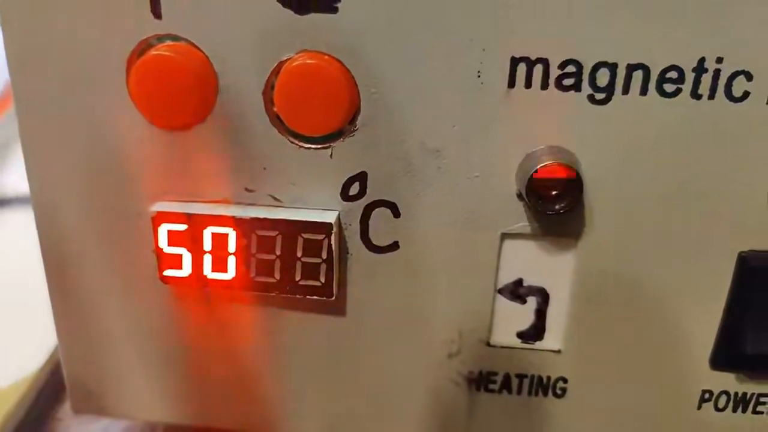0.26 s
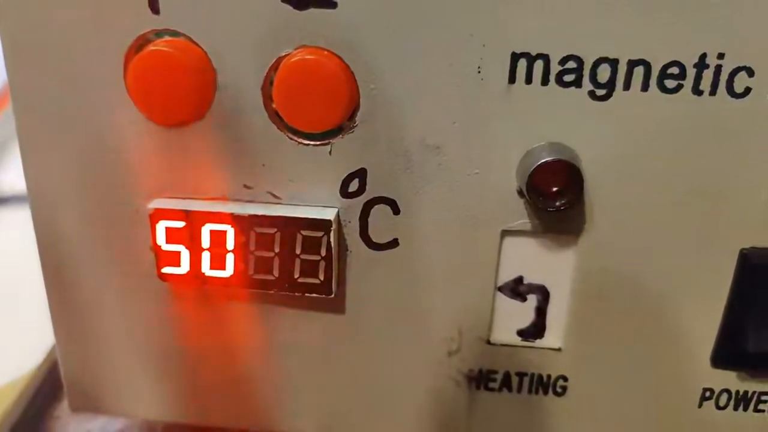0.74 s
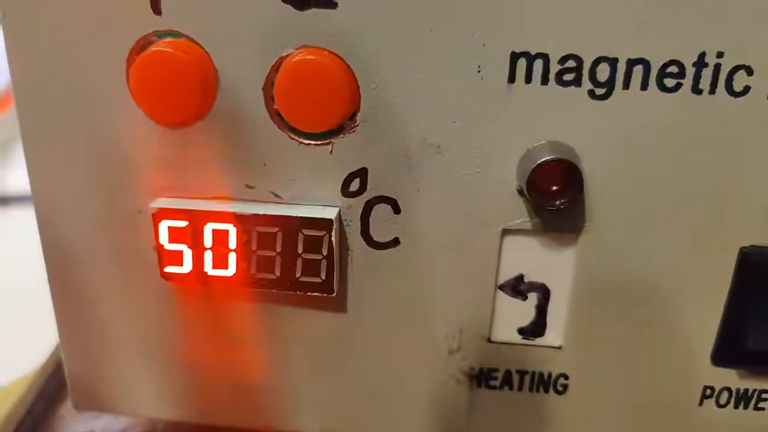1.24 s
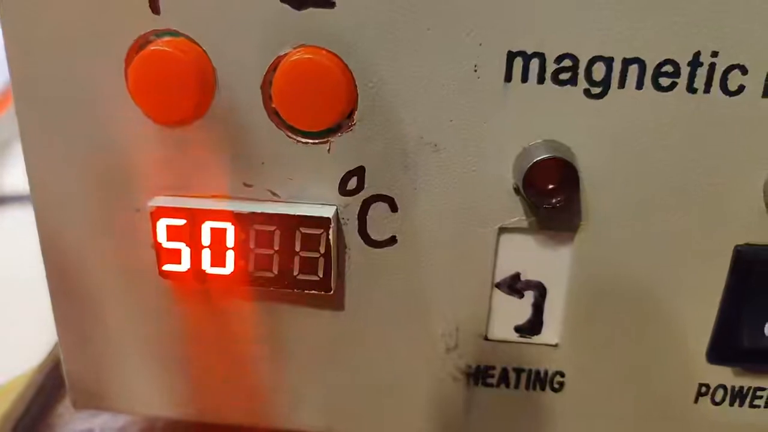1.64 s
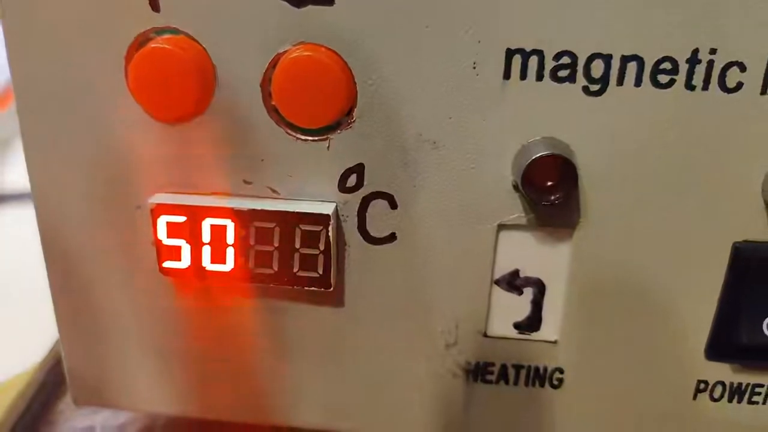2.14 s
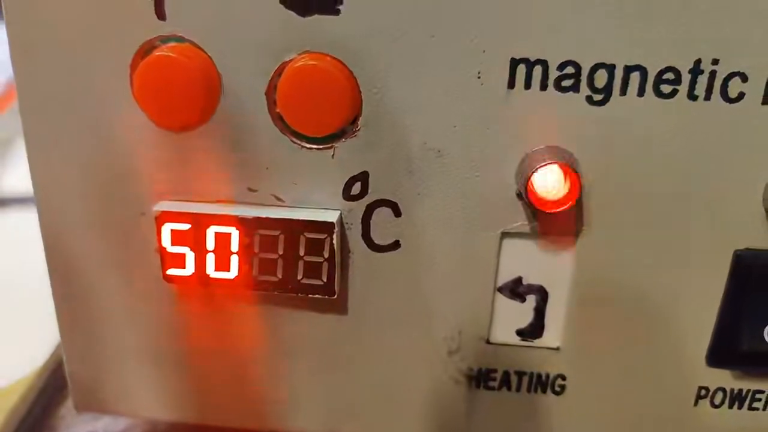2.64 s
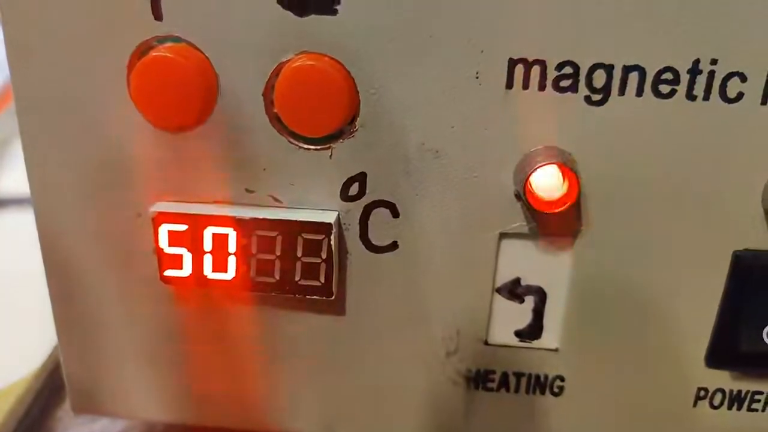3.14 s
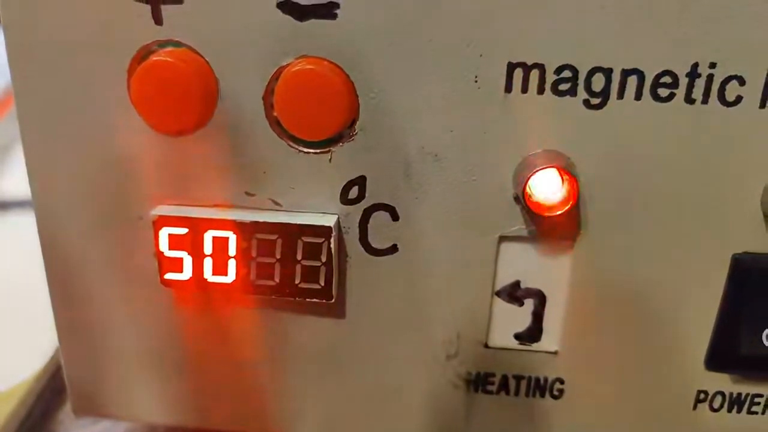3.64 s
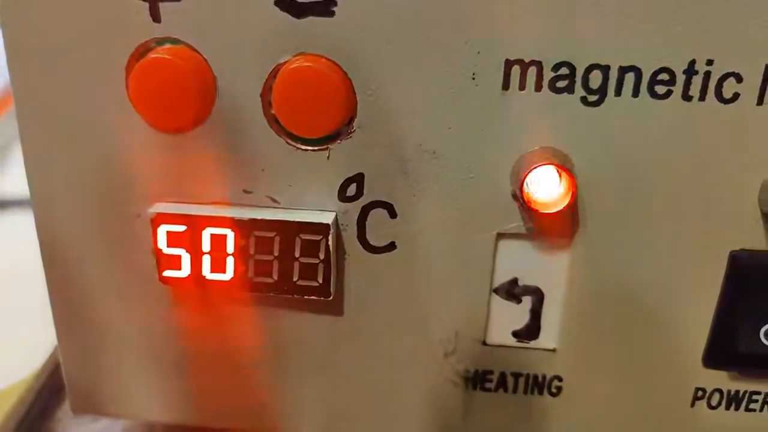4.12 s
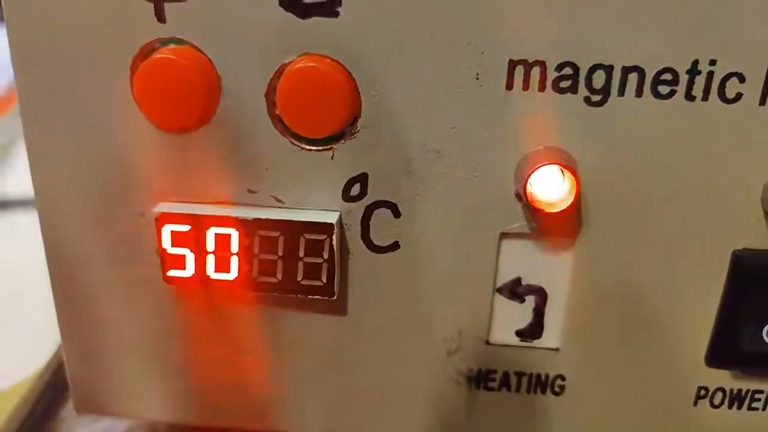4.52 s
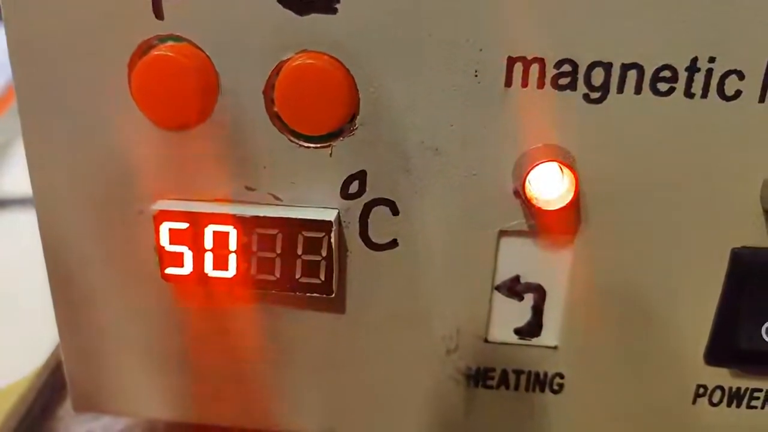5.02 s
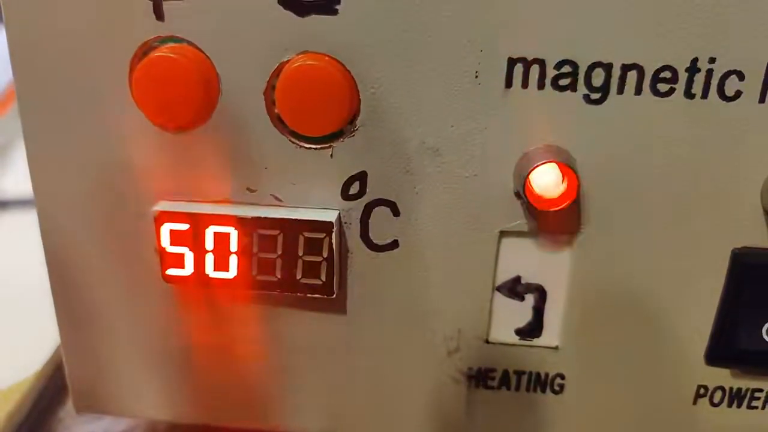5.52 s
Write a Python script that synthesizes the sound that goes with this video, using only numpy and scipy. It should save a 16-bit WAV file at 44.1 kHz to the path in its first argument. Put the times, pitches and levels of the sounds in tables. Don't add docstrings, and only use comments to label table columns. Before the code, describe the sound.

A small relay in a metal-cased heater controller ticks weakly, clicks a few times, then chatters fast and harshly in a quiet room.

```python
import sys
import numpy as np
from scipy import signal
from scipy.fft import rfft, irfft
from scipy.io import wavfile

SR = 44100
rng = np.random.default_rng(int(sys.argv[2]) if len(sys.argv) > 2 else 0)


def master(y):
    cut = np.clip(np.atleast_2d(y).T, -1, 1)
    pcm = np.round(cut * 32767)
    wavfile.write(sys.argv[1], SR, pcm.astype(np.int16))


def nominal_scale(level):
    x = np.asarray(level, float) / 20
    return 10 ** x


N = 254589
HZ = np.maximum(np.fft.rfftfreq(N, 1 / SR), 1)


def rms_one(x):
    return x / np.sqrt(np.mean(x ** 2) + 1e-20)


def at_hz(points):
    hz, value = np.transpose(points)
    return np.interp(np.log(HZ), np.log(np.maximum(hz, 1)), value)


def drift(rate):
    spectrum = rfft(rng.standard_normal(N)) / (1 + (HZ / rate) ** 2)
    return rms_one(irfft(spectrum, N))


# f/Hz, level/dB [dB per Hz]
FLOOR_SPECTRUM = [(28, -55), (45, -9.5), (100, -18), (150, -25.5), (200, -19), (300, -25.5), (700, -31.5),
                  (1400, -35.5), (3000, -40), (5500, -46), (9000, -44.5), (12000, -41), (15500, -37.5)]
# f/Hz, correlation [-1 to 1]
FLOOR_LIKENESS = [(60, 0.83), (180, 0.82), (550, 0.43), (1650, -0.22), (4970, 0.0078), (15000, -0.033)]
# f/Hz, level/dB
FLOOR_BALANCE = [(60, 12), (240, 7), (950, 6), (3770, 1), (15000, 5)]


def floor():
    floor_db, rumble_below_hz = -65.5, 100
    mid, side = rfft(rng.standard_normal((2, N))) * nominal_scale(at_hz(FLOOR_SPECTRUM))
    alike = np.clip(at_hz(FLOOR_LIKENESS), -1, 1)
    tilt = nominal_scale(at_hz(FLOOR_BALANCE) / 2)
    mid = np.sqrt(1 + alike) * mid
    side = np.sqrt(1 - alike) * side
    pair = np.array([(mid + side) * tilt, (mid - side) / tilt])
    above_rumble = irfft(pair.mean(axis=0) * (HZ > rumble_below_hz), N)
    return nominal_scale(floor_db) * irfft(pair, N) / np.std(above_rumble)


def opening(near):
    opens_at_db, opens_by_db, closes_s = -73, 4, 0.024
    r = np.exp(-1 / (closes_s * SR))
    power = signal.lfilter([1 - r], [1, -r], np.mean(near ** 2, axis=0))
    level_db = 10 * np.log10(power + 1e-12)
    excess_db = np.maximum(level_db - opens_at_db, 0)
    return nominal_scale(opens_by_db * np.tanh(excess_db / 18))


# f/Hz, level/dB
HUM_LINES = [(19, -47), (40, -68), (57, -58.5), (90, -63.5), (120, -71), (181, -71)]
# t/s, level/dB
HUM_SWELL = [
    (3.4, -4.5),
    (4.2, 2.5),
    (5.3, 2.5),
    (5.7, -4),
]


def hum():
    upper_swell_db = 2
    t = np.arange(N) / SR
    hum_swell_db = np.interp(t, *np.transpose(HUM_SWELL))
    swells = [hum_swell_db, 0.92 * hum_swell_db + upper_swell_db * drift(1.3)]
    out = 0
    for k, (hz, level_db) in enumerate(HUM_LINES):
        phase = 2 * np.pi * hz * t + hz / 150 * drift(0.8)
        waver_db = hz / 50 * drift(3)
        swell_db = swells[min(k // 2, 1)]
        out = out + nominal_scale(level_db + waver_db + swell_db) * np.sin(phase)
    return out * nominal_scale([[3.5], [-4]])


def room(x):
    t60_s, room_db, cut_hz, onset_s = 0.23, -10, 13000, 0.0011
    t = np.arange(SR // 2) / SR
    decay = nominal_scale(-60 * t / t60_s) * np.clip(t / onset_s, 0, 1)
    echoes = rng.standard_normal((2, len(t))) * decay
    echoes = signal.sosfilt(signal.butter(1, cut_hz, fs=SR, output="sos"), echoes)
    echoes = rms_one(echoes) / np.sqrt(len(t))
    return nominal_scale(room_db) * signal.fftconvolve(x, echoes, axes=1)[:, :N]


def resonate(x, modes, order):
    out = 0
    for k, (hz, width, level_db) in enumerate(modes):
        r = np.exp(-np.pi * max(width, hz / order) / SR)
        poles = [1, -2 * r * np.cos(2 * np.pi * hz / SR), r * r]
        ringing = signal.lfilter([1 - r, 0, r - 1], poles, x[k % len(x)], axis=-1)
        out = out + (-1) ** k * nominal_scale(level_db) * ringing
    return out


def bursts(rows, count, spread_db, flat):
    out = np.full((count, N), 1e-9)
    strengths = nominal_scale(spread_db * rng.standard_normal((len(rows), count)))
    for (s, ms, level_db), strength in zip(rows, strengths):
        length = max(round(ms * SR / 1000), 8)
        shape = signal.windows.tukey(length, np.clip(1 - flat, 0, 1))
        i = round(s * SR)
        out[:, i:i + length] += nominal_scale(level_db) * np.outer(strength, shape)[:, :N - i]
    return out


def grit(lumpy_db):
    sizes = nominal_scale(lumpy_db * rng.standard_normal(N))
    return rms_one(rng.standard_normal((2, N)) * sizes)


def repeats(spells, gap_ms, first_ms, spread_db, count):
    s, ms, level_db = np.transpose(spells)[:, :, None]
    draw = rng.standard_normal((len(spells), 2, count))
    gaps_ms = gap_ms * np.exp(0.2943 * draw[:, 0])
    after_ms = first_ms + np.cumsum(gaps_ms, axis=1) - gaps_ms[:, :1]
    uneven_db = level_db + spread_db * np.minimum(draw[:, 1], 1)
    level_db = np.where(after_ms < ms, uneven_db, -200)
    times = np.minimum(s + after_ms / 1000, s + ms / 1000)
    return list(zip(times.ravel(), level_db.ravel()))


# f/Hz, lead [rad]
RELAY_LEAD = [(0, 0), (1720, -0.1), (2670, 2.6), (3010, 0.1), (4910, -8.9), (5600, -13.3), (5860, -12.5),
              (7240, -9.5), (8010, -12.8), (9220, -9.8), (12400, -6.8), (16700, -6.3)]
# f/Hz, level/dB
RELAY_BALANCE = [(60, 30), (180, 4.5), (550, 11), (1650, 4), (4970, 4), (15000, 0.5)]


def two_ports(pair, alike):
    first, other = rfft(pair)
    alike = np.clip(alike, 0, 1)
    tilt = nominal_scale(at_hz(RELAY_BALANCE) / 2)
    shared = alike * first * np.exp(-1j * at_hz(RELAY_LEAD))
    right = shared + np.sqrt(1 - alike ** 2) * other
    return irfft(np.array([first * tilt, right / tilt]), N)


# t/s, peak level/dB
TWITCHES = [(0.341, -54.5), (0.367, -54.5), (0.4046, -55.5), (0.5907, -53), (0.6417, -53), (0.707, -55),
            (0.885, -52.5), (0.964, -54), (0.98, -54.5), (1.027, -52.5), (1.206, -52.5), (1.296, -55),
            (1.3184, -54), (1.388, -53), (1.4334, -49), (1.837, -52.5), (2.031, -57), (2.0409, -37.5),
            (2.074, -48), (2.212, -53), (2.2556, -54), (2.4372, -53.5), (2.4962, -55), (2.6163, -51.5),
            (2.6344, -54), (2.7535, -47), (2.78, -53.5), (2.852, -52.5), (2.948, -43.5)]
# t/s, length [ms], level/dB
TWITCH_RUNS = [
    (2.9, 42, -52),
    (3.01, 90, -58),
    (3.12, 65, -56),
    (3.2, 60, -54.5),
    (3.275, 165, -53.5),
    (3.47, 105, -53.5),
    (5.443, 62, -47.5),
    (5.518, 40, -51),
    (5.58, 130, -51),
    (5.75, 5, -54.5),
]
# t/s, level/dB
BUZZES = [
    [(2.89, -76), (2.986, -70.5), (3.112, -70), (3.58, -71)],
    [(5.4, -56.5), (5.5, -71), (5.57, -76.5), (5.6, -67.5), (5.71, -79)],
]
# f/Hz, width [Hz], level/dB
FRAME_MODES = [(683, 107, -0.5), (3230, 330, -3), (3637, 130, 2), (4700, 220, -9), (6040, 210, -11),
               (7800, 910, -16.5)]
# f/Hz, width [Hz], level/dB
COIL_MODES = [(629, 16, 6), (775, 19, 4.5), (3060, 180, -6), (3506, 35, 8.5), (4760, 110, -1.5),
              (5950, 120, -9), (8340, 450, -15)]


def coil():
    rebound_s, rebound_db = 0.0099, -6
    rebounds = [(s + rebound_s, db + rebound_db) for s, db in TWITCHES]
    runs = repeats(TWITCH_RUNS, gap_ms=14, first_ms=0.14, spread_db=1.5, count=16)
    ticks = [(s - 0.001, 7.0, db - 8) for s, db in TWITCHES + rebounds + runs]
    buzz = []
    for rows in BUZZES:
        times = np.arange(rows[0][0], rows[-1][0], 1 / 100)
        levels_db = np.interp(times, *np.transpose(rows)) + 3.6 * rng.standard_normal(len(times))
        buzz += [(s, 11.0, db + 3) for s, db in zip(times, levels_db)]
    impacts = grit(lumpy_db=1)
    lone_force = bursts(ticks, count=6, spread_db=1.5, flat=0.92)[:, None] * impacts
    dense_force = bursts(buzz, count=7, spread_db=-1.5, flat=0.069)[:, None] * impacts
    lone = nominal_scale(14.0) * resonate(lone_force, FRAME_MODES, order=18)
    dense = nominal_scale(21) * resonate(dense_force, COIL_MODES, order=42)
    return two_ports(lone + dense, alike=0.59)


# t/s, peak level/dB, length [ms], case level/dB, brightness [dB per mode]
SNAPS = [(2.039, -27.5, 2.3, -45.5, -1.5), (2.042, -28.5, 10.3, -51.5, 1.53), (2.052, -45, 19, -65, -10),
         (2.949, -30, 7.9, -50, 0.9), (3.258, -35.5, 6.1, -70, -1), (3.355, -35, 6.4, -55, -0.7),
         (3.486, -39.5, 9.7, -60, -1), (3.660, -46, 3.7, -60, -7), (3.773, -20, 5.7, -56, -11),
         (3.85, -25.5, 24, -45.5, -0.1), (5.462, -30.5, 8, -56, -0.6)]
# f/Hz, width [Hz], level/dB
LIGHT_TOUCH_MODES = [(3630, 280, -7.5), (4960, 300, -1), (6130, 390, -4), (8600, 340, -2),
                     (10000, 2800, -13.5), (12450, 600, -10), (14600, 1600, -14)]


def snaps():
    step = np.arange(len(LIGHT_TOUCH_MODES))[:, None]
    force = 0
    for s, level_db, ms, _, tilt_db in SNAPS:
        touch = bursts([(s - 0.001, ms, level_db - 8)], count=len(step), spread_db=-0.5, flat=0.49)
        force = force + nominal_scale(tilt_db * step) * touch
    ringing = resonate(force[:, None] * grit(lumpy_db=1.0), LIGHT_TOUCH_MODES, order=14)
    return two_ports(nominal_scale(8.5) * ringing, alike=0.17)


# t/s, length [ms], blades level/dB, case
# level/dB
OUTER_SPELLS = [(3.586, 17.3, -41.5, -42.5), (3.6608, 12.6, -42.5, -43.5), (3.7155, 7.5, -36.5, -38.5),
                (3.7516, 14, -38, -48), (3.803, 25.3, -36.5, -47), (4.01, 14, -32.5, -45.5),
                (4.041, 10.3, -31.5, -48), (4.072, 9.8, -42, -34), (4.1054, 3.5, -35, -44), (5.2687, 9.9, -40, -41),
                (5.3056, 12.9, -35.5, -36), (5.3475, 16.7, -36, -40.5), (5.3897, 9.2, -38.5, -35)]
# t/s, length [ms], blades level/dB, case level/dB
SPELLS = [(3.8816, 37, -35.5, -39), (3.942, 15, -33, -52), (3.958, 55, -38.5, -40.5),
          (4.132, 83, -31.5, -39), (4.218, 40.5, -37, -40), (4.2732, 34, -35, -41), (4.314, 44, -37, -37.5),
          (4.3531, 62, -33.5, -40.5), (4.454, 37, -30.5, -57), (4.5011, 32.3, -34.5, -37.5),
          (4.5368, 29.5, -40.5, -43), (4.5884, 30.8, -35.5, -42.5), (4.6226, 61, -33.5, -36.5),
          (4.697, 44, -35.5, -38), (4.7485, 48.4, -34.5, -40), (4.8277, 8.1, -34, -43),
          (4.8566, 20.4, -32.5, -46), (4.8928, 16, -33, -41.5), (4.946, 32, -35.5, -51),
          (5.0021, 45, -36.5, -40.5), (5.08, 4.8, -26.5, -39.5), (5.096, 20, -32, -64),
          (5.143, 17, -32.5, -35.5), (5.1638, 20, -35.5, -38.5), (5.2077, 49, -37.5, -37.5)]
# t/s, level/dB
HARD_STRIKES = [(3.589, -26.5), (3.6632, -25), (3.7538, -25.5), (3.8844, -27), (3.9547, -34),
                (3.974, -27), (3.9888, -25), (4.013, -27.5), (4.0427, -26), (4.0757, -19), (4.0859, -18),
                (4.1085, -22.5), (4.171, -29), (4.1742, -22.5), (4.201, -24), (4.193, -36),
                (4.2142, -25.5), (4.248, -25), (4.2599, -22), (4.3082, -20), (4.343, -26), (4.374, -25),
                (4.3887, -19.5), (4.4135, -24), (4.464, -25.5), (4.5034, -24.5), (4.51, -25),
                (4.525, -24), (4.549, -23), (4.561, -25),
                (4.6124, -29), (4.6272, -30), (4.6421, -22.5), (4.664, -33), (4.681, -29), (4.7063, -20),
                   (4.733, -26), (4.7571, -24), (4.7702, -29), (4.7881, -24), (4.792, -26.5),
                   (4.8299, -22.5), (4.842, -25), (4.8965, -27.5), (4.9098, -20.5), (4.9542, -22.5),
                   (4.9714, -25), (4.9847, -18.5), (5.0068, -24), (5.0357, -27), (5.0449, -20),
                   (5.0554, -23), (5.0846, -34), (5.097, -29), (5.11, -27), (5.1309, -20), (5.147, -26),
                   (5.157, -35), (5.2705, -32.5), (5.351, -22)]


def contact_forces(strike_ms):
    spells = OUTER_SPELLS + SPELLS
    over_rattle_db = 0
    spans = [(s, ms, db + over_rattle_db) for s, ms, db, _ in spells]
    light = repeats(spans, gap_ms=10, first_ms=7.27, spread_db=5, count=8)
    all_strikes = HARD_STRIKES + light
    strikes = [(s - strike_ms / 2000, strike_ms, db - 0.5) for s, db in all_strikes]
    rattles = [(s - 0.0015, ms + 3.95, db + 0.093) for s, ms, db, _ in spells]
    strike = bursts(strikes, count=7, spread_db=3.5, flat=0.036)
    rattle = bursts(rattles, count=7, spread_db=2.0, flat=0.82) * nominal_scale(2.08 * drift(70))
    return strike, rattle, grit(lumpy_db=2.5)


# f/Hz, width [Hz], level/dB
BLADE_MODES = [(2914, 62, -16.5), (3618, 42, -3), (3700, 67, -8), (4953, 150, -0.5), (5150, 135, -9.5),
               (5968, 315, 2), (7290, 1100, -12.5), (8560, 685, -0.5), (9455, 870, 0), (9540, 170, 5.5),
               (12060, 760, -9.5), (14000, 200, -5), (14660, 390, -8)]


def spring_blades(strike, rattle, impacts):
    radiates_from_hz = 2500
    blades = nominal_scale(10.0) * resonate((strike + rattle)[:, None] * impacts, BLADE_MODES, order=32)
    radiation = signal.butter(4, radiates_from_hz, "high", fs=SR, output="sos")
    return two_ports(signal.sosfilt(radiation, blades), alike=0.45)


# f/Hz, level/dB [dB per Hz]
CRACK_SPECTRUM = [(88, -41), (150, -3.5), (682, -17.5), (830, -5.5), (2450, -11.5), (5930, 0.5),
                  (6810, -3.5), (8130, 1.5), (14400, -3.5), (15600, -1), (16500, -51)]


def contact_crack(strike, rattle, impacts):
    cracking = nominal_scale(-3.0) * strike.mean(axis=0) + rattle.mean(axis=0)
    color = rms_one(nominal_scale(at_hz(CRACK_SPECTRUM)))
    crack = nominal_scale(-3.5) * irfft(rfft(cracking * impacts) * color, N)
    return two_ports(crack, alike=0.15)


# f/Hz, width [Hz], level/dB
CASE_MODES = [(167, 97, -21), (233.6, 23, -14.5), (330.6, 24.4, -9.5), (620, 26.4, -11), (720, 73, -13.5),
              (825, 48.6, 0.5), (916, 117, -6), (1022, 91, -5), (1350, 33, -23.5), (1660, 80, -15)]


def case():
    spells = OUTER_SPELLS + SPELLS
    knock_db = -41
    spans = [(s, ms, knock_db) for s, ms, _, _ in spells]
    knocks = repeats(spans, gap_ms=16, first_ms=2.948, spread_db=3.5, count=6)
    shoves = [(s, ms + 3.9, db - 0.5) for s, ms, _, db in spells]
    shoves += [(s, ms + 3, db) for s, _, ms, db, _ in SNAPS]
    shove = bursts(shoves, count=4, spread_db=-2.0, flat=0.874)[:, None] * grit(lumpy_db=-2.0)
    pushes = [(s, 0.4, db + 8.5) for s, db in knocks]
    knock = bursts(pushes, count=4, spread_db=-0.5, flat=0.029)
    return two_ports(nominal_scale(18.5) * resonate(shove + knock[:, None], CASE_MODES, order=16), alike=1.0)


def relay():
    strike, rattle, impacts = contact_forces(strike_ms=3.39)
    ringing = spring_blades(strike, rattle, impacts) + case()
    return ringing, contact_crack(strike, rattle, impacts)


def scene():
    ringing, crack = relay()
    ringing = ringing + snaps()
    near = ringing + crack + coil()
    echoes = room(crack + nominal_scale(-9) * ringing + nominal_scale(-11) * near)
    return near + echoes + hum() + opening(near) * floor()


def roll_off(x):
    return signal.sosfilt(signal.butter(12, 17140, fs=SR, output="sos"), x)


def record(dry):
    top_hz, top_drop_db = 15850, -26
    shelf = np.where(HZ > top_hz, nominal_scale(top_drop_db), 1)
    mix = irfft(rfft(dry) * shelf, N)
    return roll_off(mix)


dry = scene()
out = record(dry)
master(out)
```